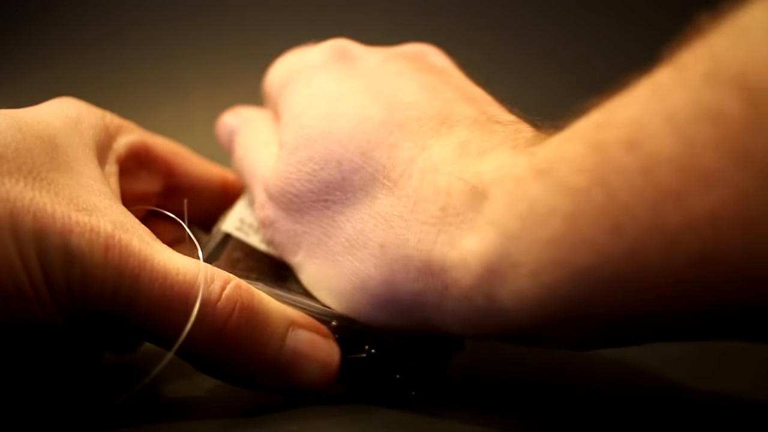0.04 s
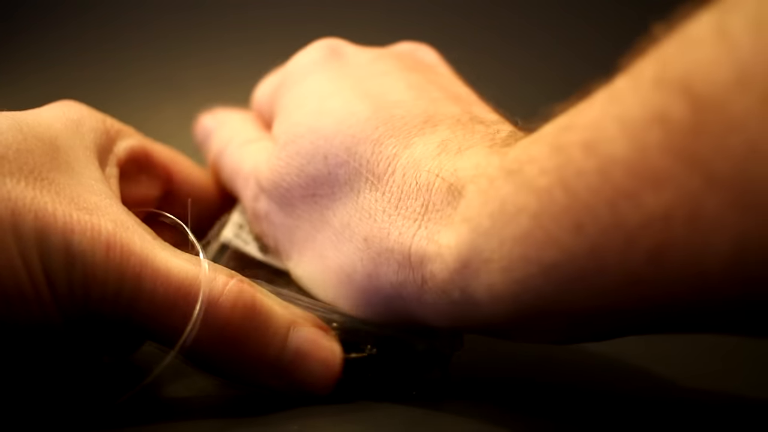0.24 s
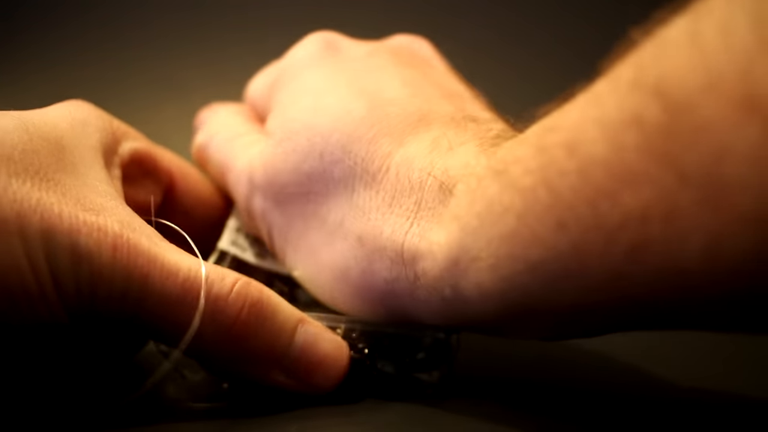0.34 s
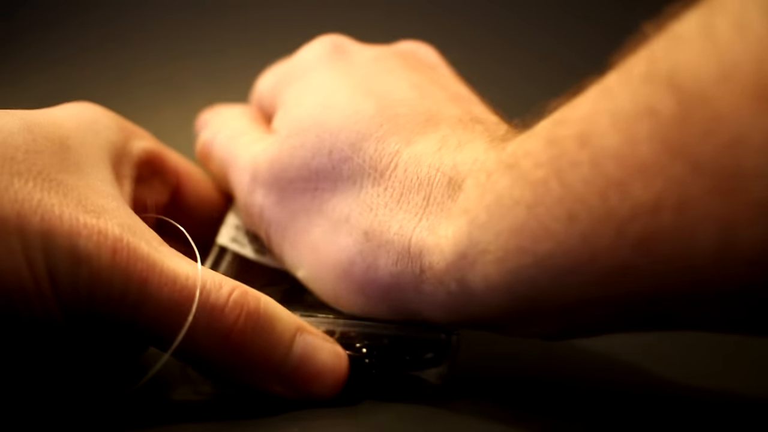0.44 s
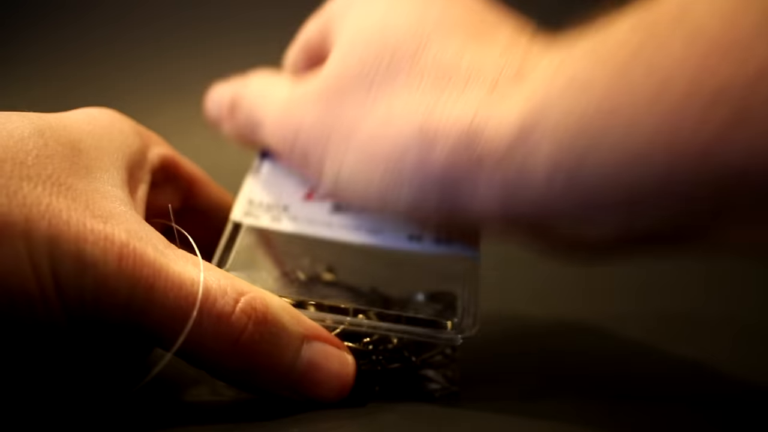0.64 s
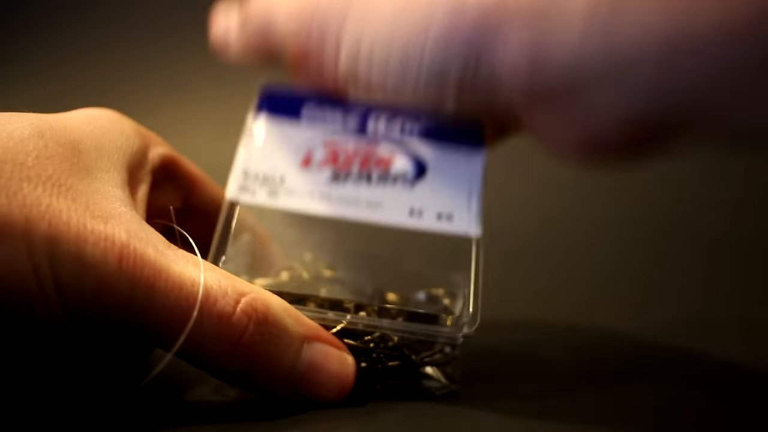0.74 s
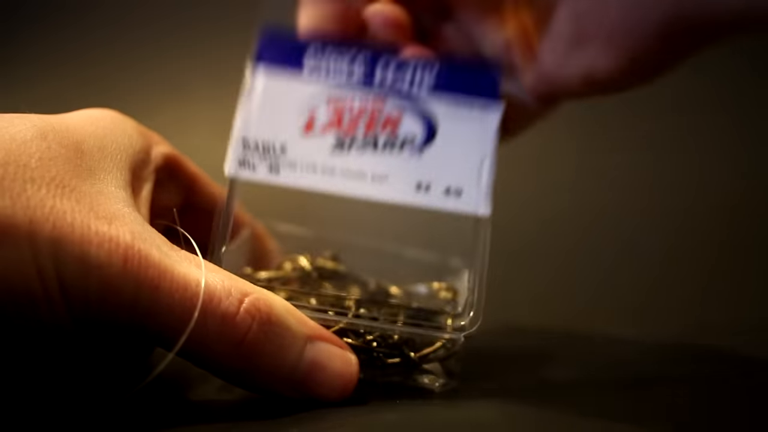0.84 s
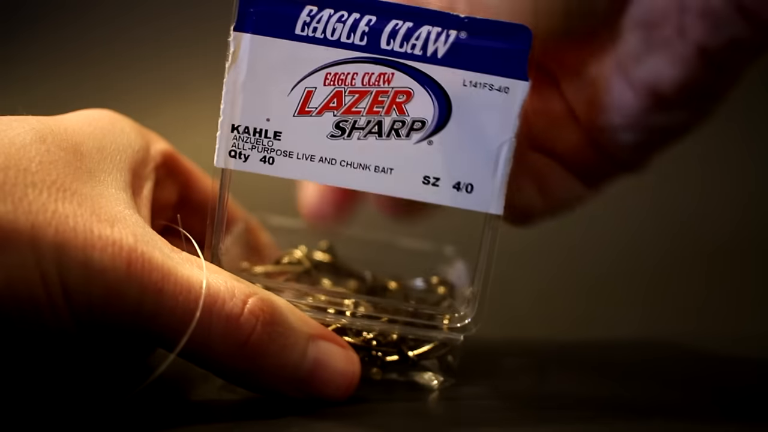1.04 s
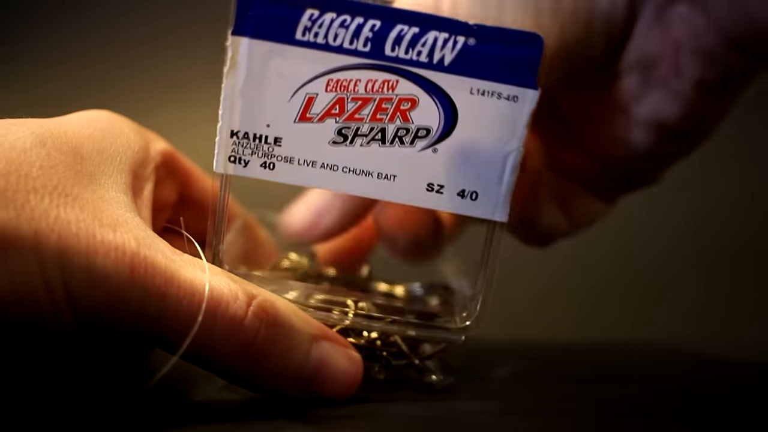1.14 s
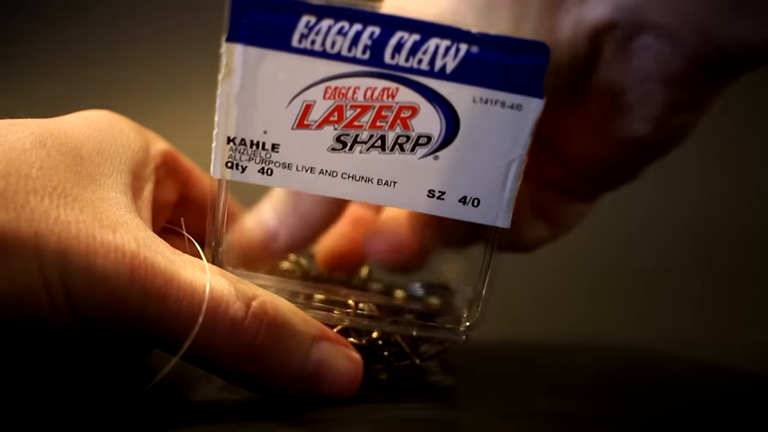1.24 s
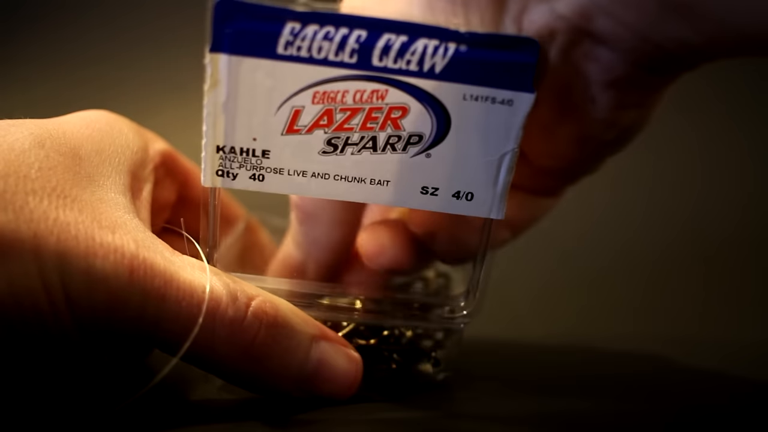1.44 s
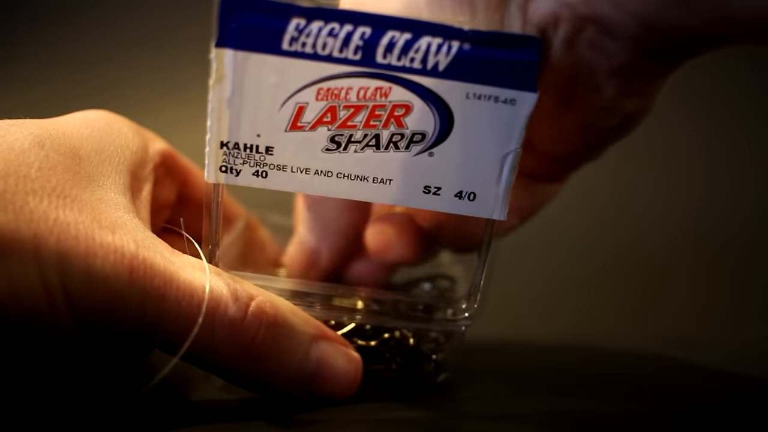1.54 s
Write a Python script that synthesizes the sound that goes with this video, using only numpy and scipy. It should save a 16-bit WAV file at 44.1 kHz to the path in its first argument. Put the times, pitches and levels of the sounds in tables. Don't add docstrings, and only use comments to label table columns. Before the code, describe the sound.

Hard plastic case crackles and pops open sharply, with light metallic rattles, very close

```python
import sys
import numpy as np
from scipy import signal
from scipy.fft import rfft, irfft, next_fast_len
from scipy.io import wavfile

SR = 44100
rng = np.random.default_rng(int(sys.argv[2]) if len(sys.argv) > 2 else 0)


def ratio(d):
    e = np.asarray(d, float) / 20
    return 10 ** e


def transcribe(signal):
    frames = np.atleast_2d(signal).T
    limited = np.clip(frames, -1, 1)
    pcm = np.round(limited * 32767).astype(np.int16)
    wavfile.write(sys.argv[1], SR, pcm)


N = 70560

# frequency [Hz], level [dB].
ROOM_TONE = [(18, -45), (30, -8), (336, -2.5), (666, -7), (1430, -4.5), (1960, -10), (2350, -4.5),
             (12300, -25.5), (16000, -32)]
ROOM_TONE_DB, ROOM_TONE_ALIKE = -52, 0.11
ROOM_T60_S, ROOM_DB, WALL_CUT_HZ = 0.078, -18, 36000

# time [s], level [dB].
LEAN = [(0, -8), (.3, -8), (.42, 13.5), (.53, 14), (.6, 3), (.72, 12), (.9, 0), (1.0, 7), (1.1, 5),
        (1.6, -3)]
RUMBLE_DB = -69.5

# start [s], level [dB], pitch [Hz], t60 [s].
BUMPS = [
    (0.316, -24.5, 121, 0.012),
    (0.571, -49, 129, 0.12),
    (.6720, -30.5, 231, 0.053),
    (0.794, -46, 170, 0.096),
    (0.868, -38.5, 143, 0.11),
    (1.0600, -24.5, 200, 0.02),
    (1.3978, -21.5, 62, 0.016),
    (1.576, -38, 225, 0.12),
    (1.5920, -35.5, 250, 0.18),
]

# time [s], level [dB].
GRIP = [(0, -47.5), (.12, -44), (.3, -36.5), (.42, -57.5), (.7, -45.5), (.85, -60), (1.02, -47.5),
        (1.1, -52.5), (1.2, -46.5), (1.32, -47), (1.42, -59.5), (1.6, -49)]
CAVITY_HZ, CAVITY_T60_S = 340, 0.04
HUM_T60_S, SHUT_HUM_T60_S = 0.042, 0.1

# time [s], level [dB].
SQUEEZE = [(0, -68), (.03, -67), (.07, -54), (.12, -46), (.2, -58), (.25, -31), (.3, -53.5)]
JOLT = [(.3165, -60), (.318, -25), (.338, -26.5), (.352, -41), (.39, -52), (.45, -80)]
OPENING = [(.47, -71), (.508, -39), (.512, -30.5), (.56, -38), (.592, -25.5), (.612, -40.5), (.64, -32),
           (.66, -44.5), (.72, -43), (.74, -52)]
SWING = [(.75, -53.5), (.89, -55), (.93, -54.5), (.99, -59), (1.005, -46.5), (1.07, -56.5), (1.1, -82)]
REACH = [(1.15, -70), (1.162, -36.5), (1.19, -32.5), (1.2, -42), (1.212, -36.5), (1.23, -36.5),
         (1.26, -57.5), (1.33, -52.5)]
PINCH = [(1.345, -45), (1.368, -35), (1.385, -24), (1.41, -38), (1.435, -41.5), (1.48, -41.5),
         (1.495, -51.5), (1.515, -41), (1.535, -42.5), (1.6, -50)]
# frequency [Hz], density [dB per Hz].
RUB_COLOUR = [(600, -100), (1000, 0.5), (1500, 4), (2400, -1), (4000, -5), (5500, -12.5), (9000, -15.5),
              (15000, -45)]
GRAINS_PER_S, GRAIN_SPREAD_DB, GRAIN_CYCLES = 16000, 2.5, 10.3
CLUMP_DB, JOLT_TILT_DB_PER_OCT = 1.3, 4.5
# frequency [Hz], level [dB], t60 [s].
LID_BANDS = [(1465, -10.5, 0.035), (2000, -10.5, .018), (2430, -6.5, .02), (3550, -7, 0.011)]
LID_OPEN_S = 1.12

# start [s], level [dB], pitch [Hz], t60 [s].
TICKS = [(.0010, -37.5, 2000, 0.0071), (.0350, -32, 2300, 0.0042), (0.475, -37.5, 1530, 0.013),
         (0.514, -26.5, 2000, 0.012), (0.514, -25.5, 11200, 0.004), (0.8874, -32.5, 2600, 0.0023),
         (0.9859, -26.5, 6710, 0.0069), (.897, -35, 2980, .005), (1.197, -25.5, 2140, 0.015),
         (1.211, -23, 2450, 0.0031), (1.3360, -33, 2740, 0.0088), (1.372, -20, 2220, 0.0076),
         (1.3735, -27, 3550, 0.017), (1.381, -18.5, 3640, 0.018), (1.415, -24, 1660, 0.053),
         (1.4617, -28, 4200, 0.004), (1.5420, -33, 8440, 0.0021), (1.549, -37, 2500, 0.015)]

# start [s], contact [ms], first swing [+1 out, -1 in].
CATCHES = [
    (0.24, 0.27, -1),
    (.3165, 0.42, -1),
    (.5687, 0.34, 1),
    (0.61, 0.26, 1),
    (1.405, 0.17, -1),
    (.5718, 0.1, 1),
    (.5032, 0.073, -1),
    (0.12, 0.94, 1),
    (.1208, 1, 1),
    (0.2, 1, 1),
]
# frequency [Hz], level [dB], t60 [s].
CATCH_MODES = [
    [(344, -26, 0.11), (504, -32, 0.056), (782, -12, 0.048), (950, -6.5, 0.032), (1200, -8, 0.037),
     (1552, -14.5, 0.053), (1990, -24, 0.022), (2740, -9.5, 0.021), (4130, -10.5, 0.013),
     (4800, -18, 0.013)],
    [(343, -22.5, 0.044), (435, -17, 0.067), (728, -24.5, 0.081), (1000, -2, 0.025), (1086, -10.5, 0.074),
     (1223, -16, 0.088), (1444, -4, 0.069), (1530, -3, 0.064), (1761, -19, .07), (2500, -12, 0.026),
     (3400, -19, .025), (4060, -26, .02)],
    [(343, -14, 0.032), (502, -20.5, 0.038), (929, -10.5, 0.026), (1445, -19.5, 0.023)],
    [(345, -21.5, 0.043), (515, -21, 0.031), (1006, -9.5, 0.019), (1600, -19.5, 0.023), (2800, -27, 0.03),
     (3470, -27, .015), (4550, -28, .012)],
    [(356.5, -25, 0.1), (1450, -6.5, 0.021), (2046, -10, 0.028), (2450, -9, 0.015), (3050, -12.5, 0.026),
     (3650, -12, 0.024), (3980, -27, .018), (5130, -28, .012)],
    [(2800, -16.5, 0.022)],
    [(1200, -33.5, 0.015), (2300, -29, 0.014), (4570, -18.5, 0.0052), (8500, -25.5, 0.0036),
     (11400, -28, 0.0025)],
    [(353, -41.5, 0.047)],
    [(343, -30.5, 0.087)],
    [(347, -31.5, 0.054)],
]

# start [s], level [dB], favoured pitch [octaves above 1 kHz],
# cavity thump [dB], crack [dB].
SNAPS = [(0.029, -29.5, 0.28, -3.5, -14.5), (.0460, -17.5, 0.38, -20.5, -21),
         (0.08, -34.5, -1.08, -8, -17.5), (.1210, -28, -0.023, 3.5, -23), (0.149, -26, -0.7, -3, -14),
         (.2040, -21, -0.5, -18, -39), (.2120, -19, -0.43, -8, -40), (0.222, -17.5, -0.71, -20, -39),
         (0.2378, -4.5, -0.1, -20, -1.5), (.2480, -42, -0.23, -23, -12), (0.3186, -11, 1.23, -40, -5),
         (0.328, -6, 0.5, -18.5, -40), (.5718, -13.5, -0.45, -20, 0), (.5930, -18.5, .5, -34, -25),
         (0.6233, -12.5, 0.76, -23, -11), (0.666, -21.5, 0.013, -9.5, -11), (0.758, -32, -0.2, -13, -7),
         (0.939, -27, 0.66, -21, -31), (0.9515, -22, 0.41, -40, -29), (1.059, -20.5, 0.67, -13, -11),
         (1.1600, -23.5, 1, -16, -28), (1.3832, -6.5, 1.46, -26.5, -22), (1.3975, 0, 1.57, -27, 2.5),
         (1.4060, -15, 1.9, -38, -7)]
# frequency [Hz], level [dB], t60 [s].
PANEL = [(720, -4.5, 0.012), (910, 3, 0.024), (1084, -0.5, 0.059), (1373, 3.5, 0.029), (1505, 1, 0.045),
         (1920, 8.5, 0.009), (2300, 7, 0.031), (2400, 12, 0.0097), (3030, 7, 0.013), (3480, 6, 0.027),
         (4155, 12, 0.011), (4840, -23, 0.036), (6250, -36, .01)]
FAVOUR_OCT, STRIKE_SPREAD_DB = 0.92, 1.5
QUICK_SHARE, LASTING_DB = 0.42, -1.5
CRACK_HZ, CRACK_T60_S = 2000, 0.0052
SHUDDER_DB, SHUDDER_HIGH_DB, SHUDDER_T60_S = -36, -21, 0.12

# frequency [Hz], difference [dB].
LEFT_LOUDER = [(60, 0.3), (180, -0.7), (550, 0.5), (1650, 3.5), (4970, 0.5), (15000, -0.5)]
# frequency [Hz], phase [radians].
LEFT_LEADS = [(0, 0), (2840, -0.18), (3700, 0.79), (6890, -1.37), (10900, 0.98), (12100, 1), (15900, 0.96)]
BOX_LOW_CUT_HZ = 170
TOP_HZ, CLIP_TOP = 16300, 1.0


def curve(rows):
    s, value = np.transpose(rows)
    return np.interp(np.arange(N) / SR, s, value)


def at_hz(points, hz):
    table_hz, value = np.transpose(points)
    return np.interp(np.log(hz), np.log(table_hz), value)


def rms_one(x):
    return x / np.sqrt(np.mean(x ** 2) + 1e-20)


def high_pass(x, order, hz):
    return signal.sosfilt(signal.butter(order, hz, "high", fs=SR, output="sos"), x)


def band_pass(x, order, low_hz, high_hz):
    return signal.sosfilt(signal.butter(order, [low_hz, high_hz], "band", fs=SR, output="sos"), x)


def ring(x, hz, t60_s):
    r = ratio(-60 / (max(t60_s, 1e-3) * SR))
    w = 2 * np.pi * hz / SR
    return signal.lfilter([0, np.sin(w)], [1, -2 * r * np.cos(w), r * r], x + 1e-18)


def add(out, s, x):
    i = int(s * SR)
    out[i:i + len(x)] += x[:len(out) - i]


def drift(rate_hz):
    r = np.exp(-2 * np.pi * rate_hz / SR)
    noise = rng.standard_normal(N + SR)
    return rms_one(signal.lfilter([1], [1, -2 * r, r * r], noise)[SR:])


def grains(count):
    size_db = GRAIN_SPREAD_DB * np.minimum(rng.exponential(1, count), 5)
    sizes = ratio(size_db) * rng.choice([-1, 1], count)
    return rms_one(sizes * (rng.random(count) < GRAINS_PER_S / SR))


def room_tone():
    hz = np.fft.rfftfreq(N, 1 / SR) + 1
    low_cut = hz ** 4 / (hz ** 4 + 75.0 ** 4)
    spectrum = rfft(rng.standard_normal((2, N))) * ratio(at_hz(ROOM_TONE, hz)) * low_cut
    mid, side = irfft(spectrum, N)
    stereo = np.sqrt(1 + ROOM_TONE_ALIKE) * mid + np.sqrt(1 - ROOM_TONE_ALIKE) * side * [[1], [-1]]
    return ratio(ROOM_TONE_DB) * rms_one(stereo)


def room(x):
    size = next_fast_len(N + SR)
    z = np.exp(-2j * np.pi * np.fft.rfftfreq(size))
    dull = 1 / np.sqrt(1 + (np.fft.rfftfreq(size, 1 / SR) / WALL_CUT_HZ) ** 2)
    out = np.zeros((2, len(z)), complex)
    lags = (rng.uniform(0.003, 0.025, 16) * SR).astype(int)
    for k, lag in enumerate(lags):
        loop = ratio(-60 * lag / SR / ROOM_T60_S) * dull * z ** lag
        out[k % 2] += loop / (1 - loop) * (-1) ** (k // 2)
    return irfft(out * rfft(x, size), size)[:, :N]


def rumble():
    mid, side = band_pass(rng.standard_normal((2, N)), 3, 70, 190)
    level_db = RUMBLE_DB + curve(LEAN) + 1.4 * drift(8.0)
    return ratio(level_db) * rms_one(mid + 0.1 * side * [[1], [-1]])


def bumps():
    out, click = np.zeros(N), np.zeros(SR // 4)
    click[0] = 1
    for s, db, hz, t60_s in BUMPS:
        knock = ring(click, hz, t60_s) - 0.5 * ring(click, hz * 1.77, t60_s * 0.42)
        add(out, s, ratio(db) * knock)
    return out


def grip():
    push = rng.standard_normal(N) * ratio(4.9 * drift(52))
    shut = 1.17 * rms_one(ring(push, CAVITY_HZ, SHUT_HUM_T60_S))
    ajar = rms_one(ring(push, CAVITY_HZ, HUM_T60_S))
    second_catch_s = CATCHES[1][0]
    hum = np.where(np.arange(N) / SR < second_catch_s, shut, ajar)
    hum = hum + 0.36 * rms_one(ring(push, 490, 0.048))
    hum = hum + 0.26 * rms_one(ring(push, 220, 0.033))
    return ratio(curve(GRIP)) * rms_one(hum)


def rub():
    strokes = SQUEEZE + JOLT + OPENING + SWING + REACH + PINCH
    level_db = curve(strokes) + CLUMP_DB * drift(76)
    start_s, end_s = JOLT[0][0], JOLT[-1][0]
    jolted = curve([(start_s - 0.005, 0), (start_s, 1), (end_s, 1), (end_s + 0.01, 0)])
    clicks, dealt = grains(N), rng.integers(0, 40, N)
    sound = np.zeros(N)
    for k, hz in enumerate(np.geomspace(600, 15500, 40)):
        colour_db = at_hz(RUB_COLOUR, hz) + jolted * JOLT_TILT_DB_PER_OCT * np.log2(hz / 2000)
        sound += ratio(colour_db) * hz * ring(clicks * (dealt == k), hz, GRAIN_CYCLES / hz)
    sound = rms_one(high_pass(sound, 2, 800))
    lid = sum(ratio(db) * rms_one(ring(clicks, hz, t60_s)) for hz, db, t60_s in LID_BANDS)
    is_open = np.arange(N) / SR > LID_OPEN_S
    return ratio(level_db) * np.where(is_open, 0.69 * (sound + lid), sound)


def ticks():
    out, t = np.zeros(N), np.arange(SR // 8) / SR
    for s, db, hz, t60_s in TICKS:
        burst = rng.standard_normal(len(t)) * ratio(-60 * t / 0.0095)
        body = ring(burst, hz, t60_s)
        wide = band_pass(burst, 2, hz * 0.55, hz * 1.8)
        add(out, s, ratio(db) * (body / np.abs(body).max() + 0.55 * wide / np.abs(wide).max()))
    return out


def after_ring():
    out, t = np.zeros(N), np.arange(SR // 4) / SR
    for (s, contact_ms, swing), modes in zip(CATCHES, CATCH_MODES):
        phase = np.minimum(t / (contact_ms / 1000), 1)
        push = np.sin(np.pi * phase) ** 2
        push = np.sign(swing) * push / push.sum()
        add(out, s, sum(ratio(db) * ring(push, hz, t60_s) for hz, db, t60_s in modes))
    return out


def snaps():
    out, t = np.zeros(N), np.arange(SR // 5) / SR
    shudder = ratio(-60 * t / SHUDDER_T60_S)
    crack_fade = ratio(-60 * t / CRACK_T60_S) + ratio(SHUDDER_HIGH_DB) * shudder
    for s, db, favour_oct, thump_db, crack_db in SNAPS:
        hiss = rng.standard_normal(len(t))
        push = ratio(SHUDDER_DB) * hiss * shudder
        push[0] = -1
        body, weights = np.zeros(len(t)), []
        for k, (hz, mode_db, t60_s) in enumerate(PANEL):
            miss = (np.log2(hz / 1000) - favour_oct) / FAVOUR_OCT
            weight = ratio(mode_db + STRIKE_SPREAD_DB * rng.normal() - 6 * miss ** 2)
            quick = ring(push, hz, t60_s * QUICK_SHARE)
            lasting = ratio(LASTING_DB) * ring(push, hz, t60_s)
            body += weight * (-1) ** k * (quick + lasting)
            weights.append(weight)
        body *= 0.5 / np.linalg.norm(weights)
        thump = ratio(thump_db) * ring(push, CAVITY_HZ, CAVITY_T60_S)
        crack = 2 * ratio(crack_db) * band_pass(hiss * crack_fade, 1, CRACK_HZ, 2 * CRACK_HZ)
        add(out, s, ratio(db) * (body + thump + crack))
    return out


def scene():
    box = high_pass(snaps() + after_ring() + ticks() + rub() + grip(), 2, BOX_LOW_CUT_HZ)
    box = box + high_pass(bumps(), 2, 60)
    hz = np.fft.rfftfreq(N, 1 / SR) + 1
    skew = ratio(at_hz(LEFT_LOUDER, hz) / 2) * np.exp(0.5j * at_hz(LEFT_LEADS, hz))
    direct = irfft(rfft(box) * [skew, 1 / skew], N)
    return direct + ratio(ROOM_DB) * room(box) + room_tone() + rumble()


def top_cut(x):
    return signal.sosfilt(signal.butter(12, 16370, fs=SR, output="sos"), x)


def record(dry):
    low_pass = signal.cheby2(12, 60, TOP_HZ, fs=SR, output="sos")
    mix = np.clip(signal.sosfilt(low_pass, dry), -CLIP_TOP, CLIP_TOP)
    return top_cut(mix)


dry = scene()
out = record(dry)
transcribe(out)
```